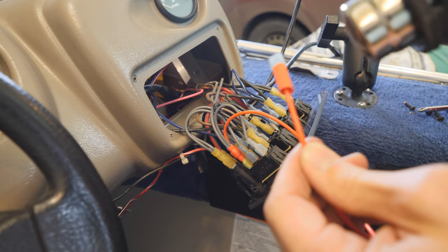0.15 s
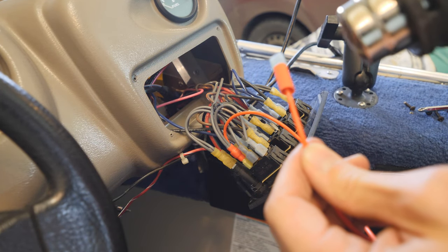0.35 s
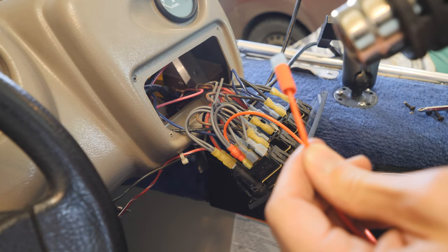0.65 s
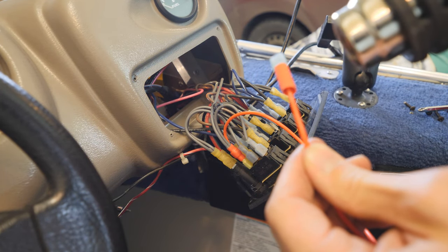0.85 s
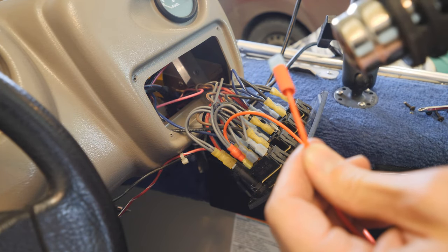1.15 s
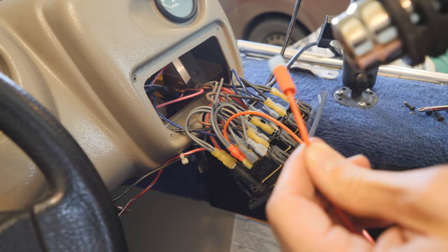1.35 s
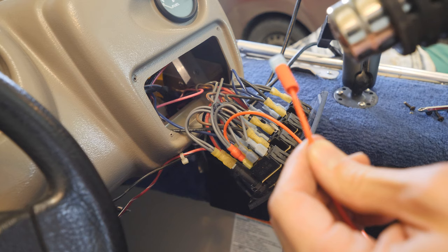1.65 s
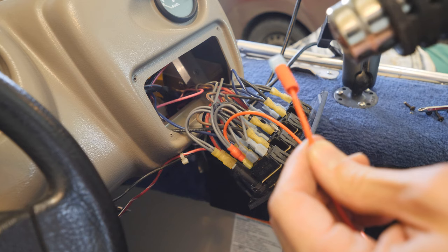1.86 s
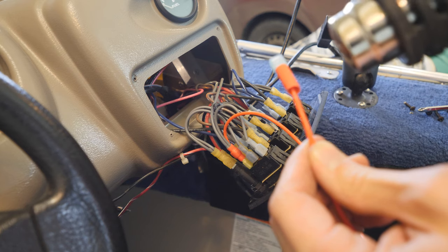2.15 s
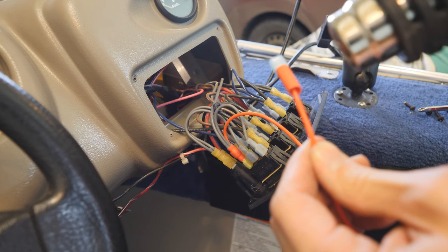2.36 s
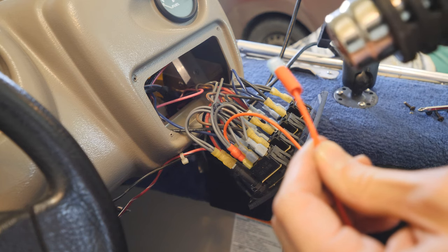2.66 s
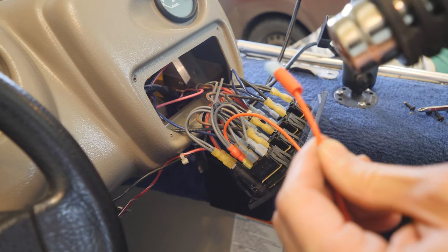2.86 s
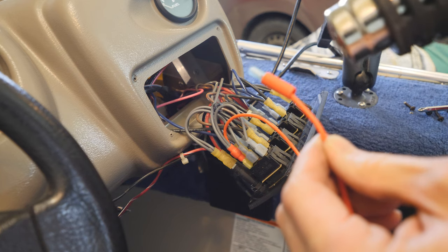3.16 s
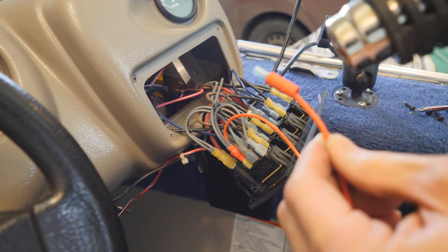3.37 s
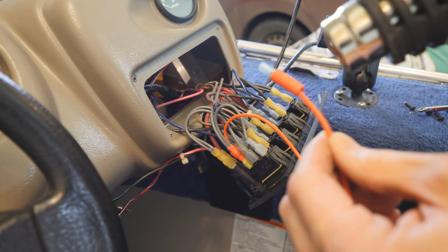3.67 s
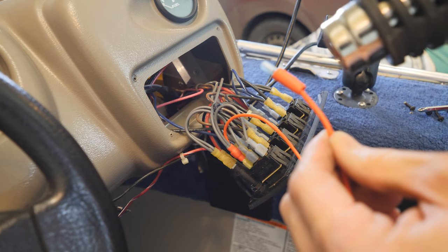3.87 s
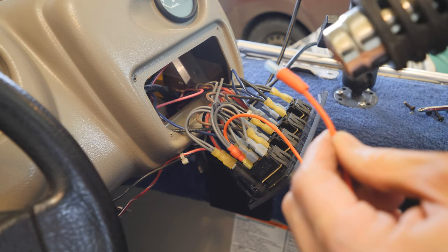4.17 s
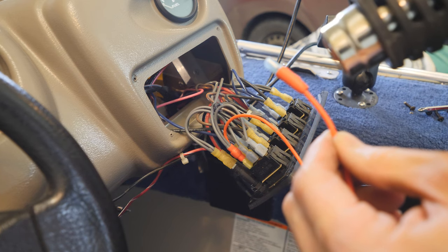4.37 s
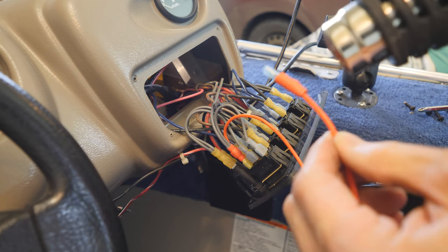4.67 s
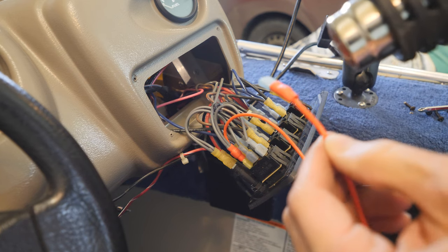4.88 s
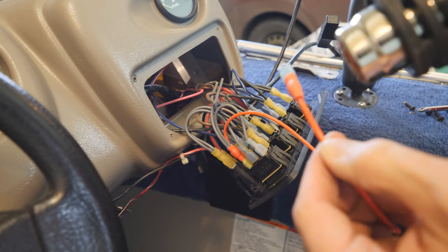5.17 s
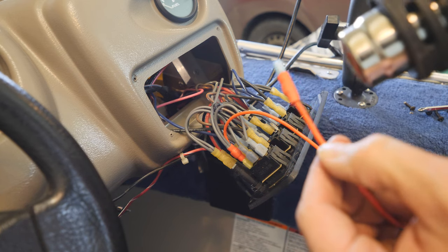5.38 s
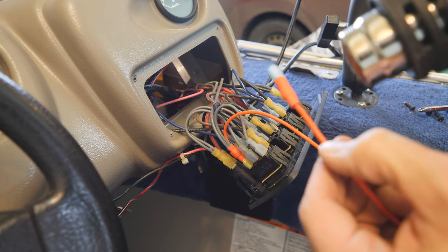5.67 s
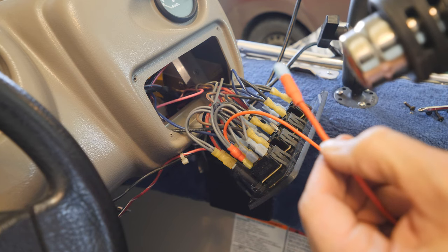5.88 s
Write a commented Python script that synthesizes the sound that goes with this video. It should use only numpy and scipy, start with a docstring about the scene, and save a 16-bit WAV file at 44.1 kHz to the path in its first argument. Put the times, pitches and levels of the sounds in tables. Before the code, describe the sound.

Close, continuous airy hiss of a heat gun warming heat-shrink tubing, with a fan whine and a faint motor hum.

```python
"""A heat gun, just switched on, blows on heat-shrink tubing at a small boat's helm; close, in mono.
First the motor creeps up to full speed: turbulent air excites the resonances of housing and nozzle,
while the shaft hums and fan and motor whine at harmonics of the rotation rate. A thin whistle passes.
Near 3.4 s the nozzle is brought close to the tubing and the hiss sharpens. Near 4.9 s it is drawn back;
the jet slips off the tubing, the nozzle rings up briefly, and two more faint whistles come and go."""
import sys
import numpy as np
from scipy import signal
from scipy.fft import rfft, irfft
from scipy.io import wavfile
from scipy.ndimage import map_coordinates

SR = 44100
rng = np.random.default_rng(int(sys.argv[2]) if len(sys.argv) > 2 else 0)


def store_pcm(level_fs):
    """Save levels as 16-bit WAV."""
    pcm = np.round(np.clip(level_fs, -1, 1) * 32767).astype(np.int16)
    wavfile.write(sys.argv[1], SR, np.atleast_2d(pcm).T)


N = 265790
TIME = np.arange(N) / SR
BIN_HZ = np.maximum(np.arange(N // 2 + 1) * SR / N, 1)
FULL_SPEED_HZ, CUTOFF_HZ = 285.9, 15850
HUM_ORDER, BLADE_ORDER, WHINE_ORDER = 1, 7, 12  # multiples of the rotation rate

# Broadband rush of the air at full speed: f/Hz, spectral density level/dB
RUSH_SPECTRUM = [(25, -113.5), (45, -96), (75, -80.5), (160, -73.5), (290, -67), (470, -70.5), (600, -61),
                 (1600, -63.5), (2900, -70.5), (4100, -61), (6000, -71), (7700, -80), (10000, -85),
                 (15500, -99.6)]
# Air resonances of housing and nozzle at full speed: f/Hz, width/Hz, peak density level/dB
CAVITY_MODES = [(660, 76, -65), (792, 94, -55.5), (1122, 226, -54), (1245, 117, -53), (1346, 132, -53),
                (1843, 133, -58.5), (2465, 500, -57.5), (3036, 268, -50.5), (3554, 480, -56),
                (3864, 155, -54.5), (4230, 240, -59), (4560, 81, -71), (4970, 230, -66.5),
                (5460, 480, -59.5), (5993, 370, -62.5), (6550, 280, -73.5), (7180, 360, -73.5),
                (8370, 1060, -80.5), (9100, 400, -84), (11600, 360, -90)]
# Bands of the rush: lower edge f/Hz, exponent of fan speed, gain with the nozzle close/dB
RUSH_BANDS = [(0, 2, -0.1), (990, 4, -1.2), (1500, 3.5, 0.3), (2850, 2.6, -0.4), (3140, 3.2, 0.8),
              (4000, 0, -2.5), (4400, 1.8, -0.5), (5250, 4, .3), (5510, 0, 3.5), (5870, 0, 0),
              (7400, 3, -0.1)]
# Quick and slow stage of the run-up: initial shortfall in rotation rate/Hz, time constant/s
SPIN_UP_STAGES = [(24.06, .42), (20.24, 1.25)]
# Fan whine, swelling briefly as its pitch runs up through a housing resonance, later rising and fading as the
# gun is turned: t/s, level/dB
WHINE_ENVELOPE = [(0.0, -37), (0.22, -26.5), (0.5, -33), (1.5, -30), (1.7, -27), (2.8, -27.5), (4.6, -36),
                  (5.2, -26.5), (6.03, -30)]
# Weaker motor harmonics at full speed: order, level/dB
WEAK_HARMONICS = [(3, -51.5), (4, -48.5), (5, -39), (6, -41.5), (8, -43), (10, -46.5), (11, -48),
                  (13, -38.5), (15, -43), (16, -40), (21, -46), (30, -59)]
# Spectral envelope of all remaining harmonics at full speed: f/Hz, level per line/dB
BUZZ_SPECTRUM = [(2500, -49), (5700, -52), (6500, -50), (7200, -65), (8300, -63), (9800, -74), (12300, -71),
                 (14000, -76), (15700, -81)]
# Whistles at the nozzle: centre t/s, duration/s, f/Hz, peak rms level/dB
NOZZLE_WHISTLES = [(1.85, .9, 13520, -68), (5.55, .9, 13430, -66), (5.7, 1.0, 12050, -63)]


def airflow(relative_speed, closeness, flutter_db=.36, gust_db=.1):
    """Forced resonance: turbulence drives fixed cavities, and the nearby tubing colours the jet."""
    cavity_power = sum(resonance(*mode) ** 2 for mode in CAVITY_MODES)
    rush_power = from_db(level_at(RUSH_SPECTRUM, BIN_HZ)) ** 2
    jet_spectrum = turbulence(np.sqrt(rush_power + cavity_power))
    band_of_bin = np.searchsorted([row[0] for row in RUSH_BANDS[1:]], BIN_HZ)
    rush = 0
    for k, (_, exponent, close_db) in enumerate(RUSH_BANDS):
        band = irfft(jet_spectrum * (band_of_bin == k), N)
        eddy_db = flutter_db * drift(rate=12)  # eddies of each size flutter on their own
        rush += band * relative_speed ** exponent * from_db(close_db * closeness + eddy_db)
    return rush * from_db(gust_db * drift(rate=7.5))


def hum_and_whine(shaft_angle, relative_speed, drawn_back, waver_db=.17):
    """Periodic forcing: shaft and fan radiate strong tones, phase-locked to the rotation."""
    speed_db = 20 * np.log10(relative_speed)  # its multipliers below are power-law exponents
    hum_db = -47.5 + 2.6 * speed_db + .86 * TIME
    levels = {HUM_ORDER: hum_db,
              2 * HUM_ORDER: hum_db - 2.5,
              BLADE_ORDER: -35 + 4.1 * speed_db + 1.6 * drawn_back,
              WHINE_ORDER: np.interp(TIME, *np.transpose(WHINE_ENVELOPE)),
              2 * WHINE_ORDER: -48.5 - 2.5 * speed_db - 11 * drawn_back}
    return sum(harmonic(shaft_angle, order, db + waver_db * drift(rate=18))
               for order, db in levels.items())


def motor_buzz(shaft_angle, relative_speed):
    """Interference: dashboard reflections make the weak harmonics fade in and out as the hand moves."""
    strong_orders = (HUM_ORDER, 2 * HUM_ORDER, BLADE_ORDER, WHINE_ORDER, 2 * WHINE_ORDER)
    buzz = 0
    for order in range(1, int(CUTOFF_HZ / FULL_SPEED_HZ) + 1):
        if order not in strong_orders:
            hz = order * FULL_SPEED_HZ
            db = dict(WEAK_HARMONICS).get(order, level_at(BUZZ_SPECTRUM, hz))
            fading_db = np.sqrt(hz / 4000) * np.minimum(drift(rate=2.57), 1.5)  # short waves fade most
            buzz += harmonic(shaft_angle, order, db + fading_db)
    return buzz * relative_speed


def nozzle_swell():
    """Transient excitation: a nozzle resonance rings up as the jet slips off the tubing."""
    ring = irfft(turbulence(resonance(hz=3600, width_hz=450, db=-54.5)), N)
    return ring * swell(centre_s=5.34, half_width_s=.2)


def nozzle_whistles():
    """Sharp resonance: air noise confined to a narrow band is heard as a thin whistle."""
    whistles = 0
    for centre_s, duration_s, hz, db in NOZZLE_WHISTLES:
        band = irfft(turbulence(resonance(hz, width_hz=70, db=0)), N)
        whistles += from_db(db) * band / band.std() * swell(centre_s, duration_s / 2)
    return whistles


def turbulence(gain):
    """Spectral shaping: the spectrum of white noise weighted by an amplitude density."""
    return rfft(rng.standard_normal(N)) * gain * np.sqrt(SR / 2)


def resonance(hz, width_hz, db):
    """Lorentzian gain curve of one air resonance; the width is taken at half amplitude."""
    return from_db(db) / (1 + (2 * (BIN_HZ - hz) / width_hz) ** 2)


def harmonic(shaft_angle, order, db):
    """Simple harmonic motion of given rms level at a multiple of the rotation rate."""
    return np.sqrt(2) * from_db(db) * np.sin(order * shaft_angle + 2 * np.pi * rng.random())


def drift(rate):
    """Smooth random modulation of about unit spread, changing some `rate` times a second."""
    knots = rng.standard_normal(4096)
    coarse_s = TIME[::32]
    curve = map_coordinates(knots, [coarse_s * rate], order=3, mode="mirror")
    return np.interp(TIME, coarse_s, curve)


def swell(centre_s, half_width_s):
    """Gaussian envelope of height 1."""
    return np.exp(-((TIME - centre_s) / half_width_s) ** 2)


def hand_move(centre_s, duration_s=.35):
    """Sigmoid travel of the hand from 0 to 1."""
    return .5 + .5 * np.tanh(2 * (TIME - centre_s) / duration_s)


def level_at(spectrum, hz):
    """Interpolation of level on a logarithmic frequency axis."""
    knot_hz, db = np.transpose(spectrum)
    return np.interp(np.log(hz), np.log(knot_hz), db)


def from_db(db):
    """Amplitude ratio for a level in decibels."""
    return 10 ** (np.asarray(db) / 20)


def scene():
    """Superposition: air noise and motor tones add, while the speed nears its limit exponentially."""
    speed_hz = FULL_SPEED_HZ - sum(shortfall * np.exp(-TIME / tau) for shortfall, tau in SPIN_UP_STAGES)
    relative_speed = speed_hz / FULL_SPEED_HZ
    moved_in, drawn_back = hand_move(centre_s=3.36), hand_move(centre_s=4.9)
    air = airflow(relative_speed, closeness=moved_in - drawn_back) + nozzle_swell() + nozzle_whistles()
    speed_wobble = 1 + .0003 * drift(rate=20)
    shaft_angle = 2 * np.pi * np.cumsum(speed_hz * speed_wobble) / SR
    tones = hum_and_whine(shaft_angle, relative_speed, drawn_back)
    gun = air + tones + motor_buzz(shaft_angle, relative_speed)
    return np.array([gun, gun])


def record(dry):
    """Band limiting: an elliptic low-pass filter cuts the top steeply."""
    return signal.sosfilt(signal.ellip(12, .1, 90, CUTOFF_HZ, fs=SR, output="sos"), dry)


dry = scene()
out = record(dry)
store_pcm(out)
```